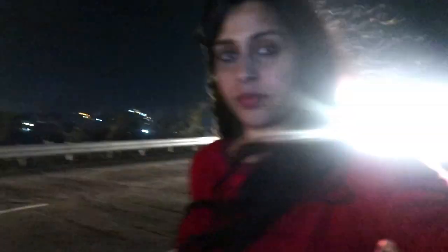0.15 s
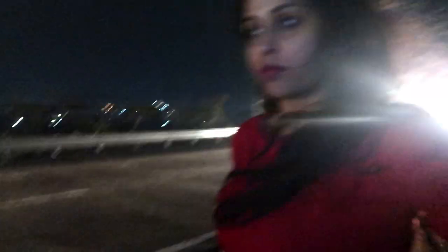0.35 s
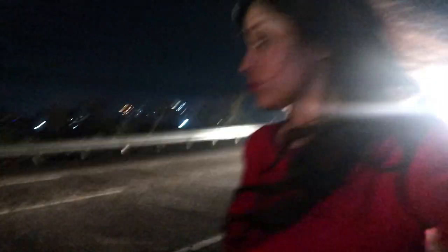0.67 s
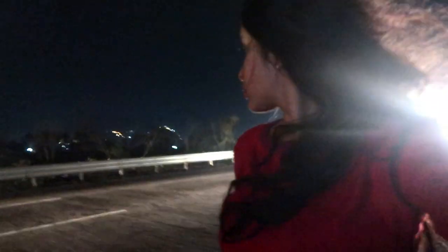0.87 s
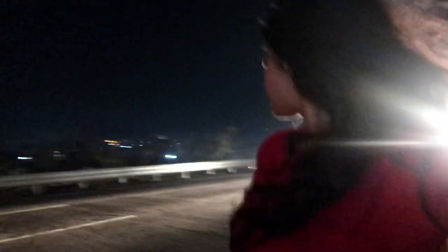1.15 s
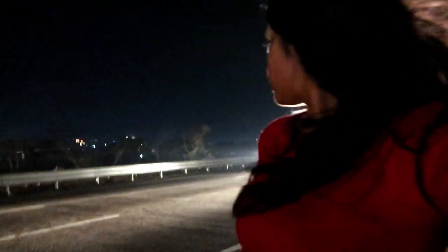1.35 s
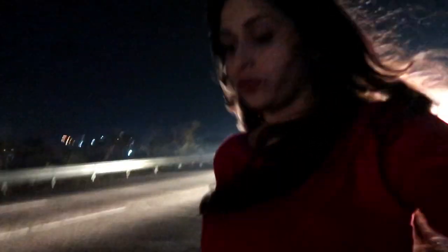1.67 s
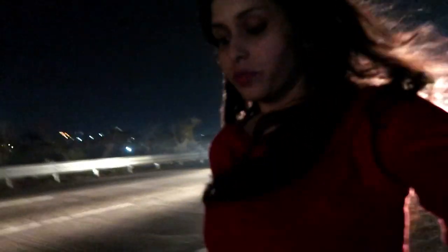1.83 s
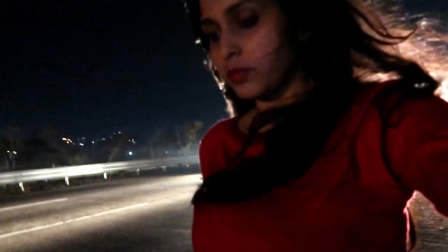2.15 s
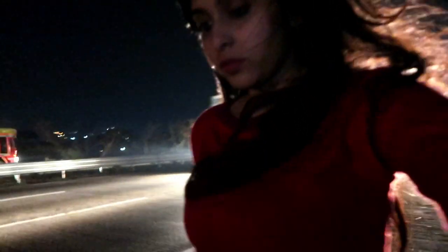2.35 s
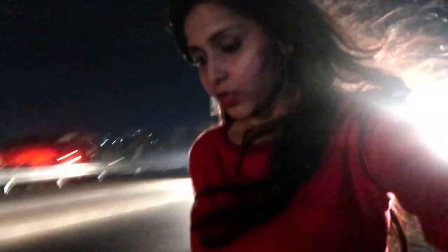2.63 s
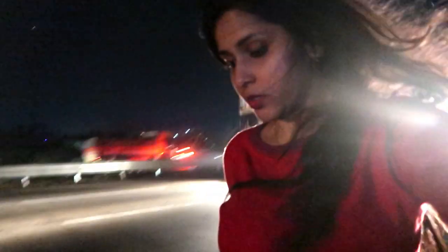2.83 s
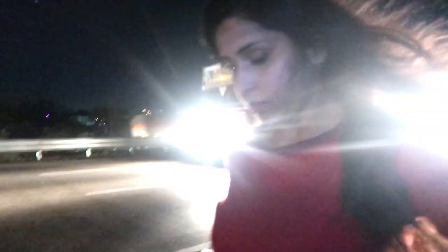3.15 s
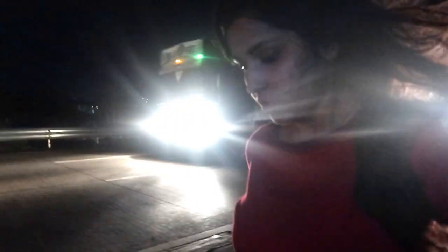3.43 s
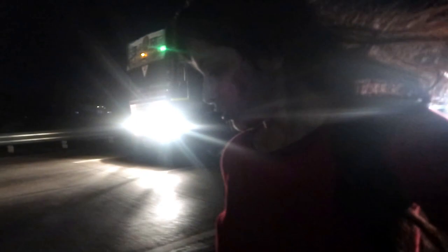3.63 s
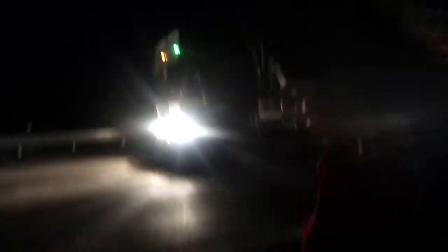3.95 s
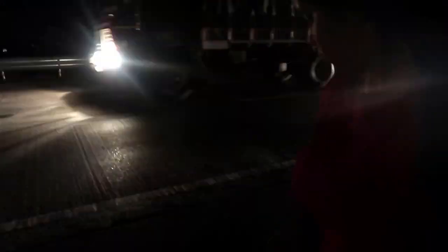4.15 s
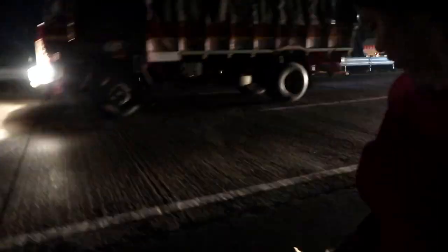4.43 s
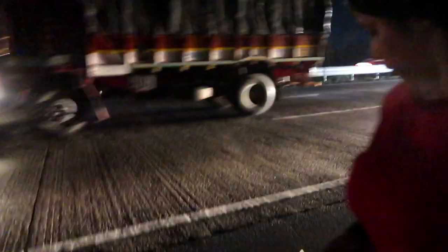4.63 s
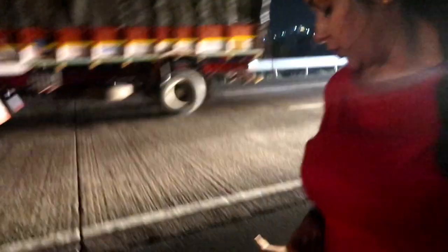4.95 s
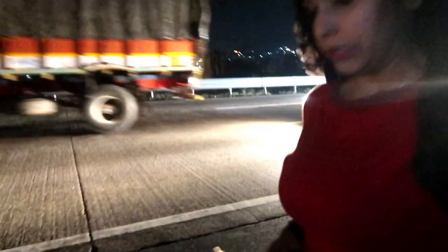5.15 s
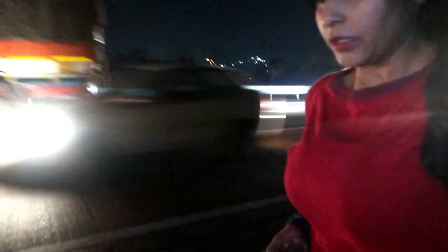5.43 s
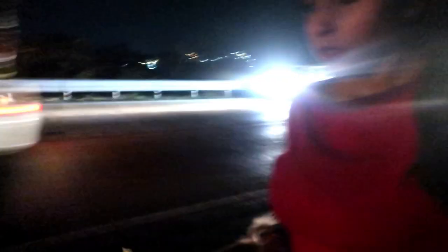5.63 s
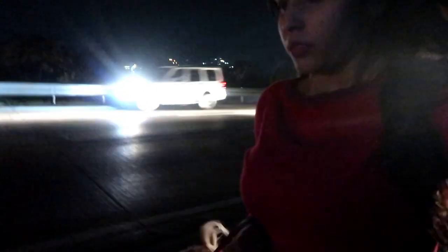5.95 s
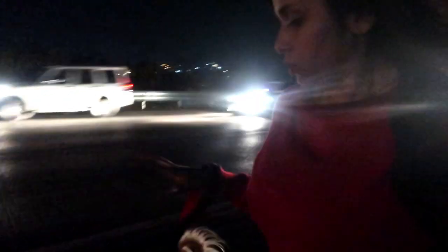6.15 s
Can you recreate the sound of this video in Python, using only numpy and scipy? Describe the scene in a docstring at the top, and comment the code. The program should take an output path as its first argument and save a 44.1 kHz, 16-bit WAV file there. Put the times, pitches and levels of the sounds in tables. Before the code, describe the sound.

Night highway heard from the shoulder: cars and a heavy truck rush past close by while gusts thump and buffet the microphone.

```python
"""A highway at night, heard from the shoulder: a far lorry drones, cars rush by, a heavy truck passes close.
Tyres are shaped noise that swells and fades with distance; drone, whine and chirps are fuzzy tones.
A tyre whine sinks at first, and a thin high chirping, like a bush cricket, comes from the verge.
Slipstream buffets the microphone in gusts of lumpy noise and in single thumps,
and the hardest make the gain control duck the traffic."""
import sys
import numpy as np
from scipy import signal
from scipy.fft import rfft, irfft, next_fast_len
from scipy.io import wavfile
from scipy.ndimage import uniform_filter1d, minimum_filter1d, map_coordinates

SR = 44100
rng = np.random.default_rng(int(sys.argv[2]) if len(sys.argv) > 2 else 0)


def wav_record(signal):
    """Record a signal, one row per channel, as 16-bit PCM in the file named by sys.argv[1]."""
    frames = np.transpose(np.atleast_2d(signal))
    bounded = np.clip(frames, -1, 1)
    # unit amplitude maps onto the largest positive 16-bit level
    quanta = np.round(bounded * 32767).astype(np.int16)
    wavfile.write(sys.argv[1], SR, quanta)


N = 277168  # length in samples


def amp(db):
    """Turn decibels into gain."""
    return 10 ** (np.asarray(db) / 20)


def unit(x):
    """Scale to an rms of 1."""
    return x / np.sqrt(np.mean(x ** 2) + 1e-20)


def seconds():
    """Time of every sample."""
    return np.arange(N) / SR


def noise():
    """Plain white noise."""
    return rng.standard_normal(N)


def bump(centre_s, spread_s):
    """A bell-shaped swell that peaks at 1."""
    return np.exp(-.5 * ((seconds() - centre_s) / spread_s) ** 2)


def curves(rows):
    """Join the rows with straight lines: one curve for each column after the time."""
    s, *columns = np.transpose(rows)
    return [np.interp(seconds(), s, column) for column in columns]


def wobble(rate):
    """A smooth random curve through `rate` random points a second."""
    return map_coordinates(rng.standard_normal(8192), [np.arange(N) * rate / SR], mode="wrap")


def filtered(x, response):
    """Multiply the spectrum of x by a gain that depends on frequency."""
    size = next_fast_len(N + 8192)
    spectrum = rfft(x, size) * response(np.fft.rfftfreq(size, 1 / SR))
    return irfft(spectrum, size)[..., :N]


def coloured(x, spectrum):
    """Shape x by points of Hz and relative dB on a log frequency axis, at an rms of 1."""
    points_hz, db = np.transpose(spectrum)
    return unit(filtered(x, lambda hz: amp(np.interp(np.log(hz + 1), np.log(points_hz), db))))


def rush(spectrum, patchy_db):
    """Noise at an rms of 1 whose gain drifts in patches of time and frequency."""
    cells = signal.stft(noise(), nperseg=1024)[2]
    across_pitch = uniform_filter1d(rng.standard_normal(cells.shape), size=5, axis=0)
    patches = unit(uniform_filter1d(across_pitch, size=10, axis=1))
    patchy = signal.istft(cells * amp(patchy_db * patches), nperseg=1024)[1][:N]
    return coloured(patchy, spectrum)


def narrow(pitch_hz, width_hz):
    """A fuzzy tone: slow random curves make a narrow band of noise that rides on a pitch curve."""
    phase = 2 * np.pi * np.cumsum(pitch_hz) / SR
    return unit(wobble(width_hz) * np.cos(phase) + wobble(width_hz) * np.sin(phase))


def stereo(mid, side):
    """Left and right from their common and opposite parts."""
    return np.array([mid + side, mid - side])


# What goes by. Each row: nearest moment in seconds, approach time in seconds, leaving time in seconds,
# tyre roar in dB, hiss in dB, wide hiss in dB.
PASSES = [(.42, 0.63, 0.33, -24, -34, -41.5), (2.86, 1, 0.29, -18.5, -27.5, -38),
          (4.22, 0.14, 0.067, -23, -20.5, -42), (4.56, 0.27, 0.31, -29, -23.5, -51),
          (5.1, 0.55, 0.16, -19, -19.5, -42.5), (5.52, 0.093, 0.14, -17.5, -21, -39.5),
          (5.79, 0.14, 0.48, -26.5, -46, -51), (6.19, 0.26, 0.3, -23, -23, -44)]
# Names for the rows, in order.
FIRST_CAR, FAR_LORRY, TRUCK_FRONT, TRUCK_BED, TRUCK_REAR, NEAR_CAR, FAR_CAR, LAST_CAR = range(len(PASSES))


def nearness(which, fall):
    """Gain of a vehicle on a straight lane: 1 at its nearest, falling as distance to the power `fall`."""
    nearest_s, approach_s, leaving_s = PASSES[which][:3]
    t = seconds() - nearest_s
    distance = np.hypot(1, t / np.where(t < 0, approach_s, leaving_s))
    return distance ** -fall


# Where the traffic lies, swinging from right to left. Each row: time in seconds,
# lead at the left port in microseconds, low treble of left over right in dB.
BEARING = [(0, -24, -0.5), (3.1, -7.5, 0.5), (4.2, -8, 1), (5.2, 3, -5.5), (6.2, 9, -5)]


def placed(x):
    """A road sound reaches one port slightly before the other; its slope times half the lead shifts it."""
    lead_us, _ = curves(BEARING)
    return stereo(x, np.gradient(x) * SR * lead_us / 1e6 / 2)


# Colour of the engine rumble. Each row: frequency in Hz, relative level in dB.
RUMBLE = [(20, -23.5), (45, -9.5), (75, 0.5), (120, 4), (190, 2), (300, -0.5), (600, -24), (1500, -90)]


def lorry(drone_hz=202, drone_db=-32.0, drone_fall=0.73, rumble_db=-26, rumble_fall=4.2,
          first_db=-29, first_fall=0.78, truck_db=-42):
    """A distant diesel: dark rumble under a fuzzy exhaust note. The first car and the truck rumble too."""
    engines = [(FAR_LORRY, rumble_db, rumble_fall), (FIRST_CAR, first_db, first_fall),
               (TRUCK_REAR, truck_db, rumble_fall)]
    power = sum((amp(db) * nearness(which, fall)) ** 2 for which, db, fall in engines)
    rumble = np.sqrt(power) * rush(RUMBLE, patchy_db=0.5)
    note = narrow(np.full(N, drone_hz), width_hz=22)
    drone = amp(drone_db) * nearness(FAR_LORRY, drone_fall) * note
    return stereo(rumble + drone, 0)


# Chirps from the verge. Each row: start in seconds, length in seconds, level in dB before the fade.
CHIRPS = [(.14, .07, -48), (.405, .1, -43.5), (.92, .09, -44.5), (1.17, .1, -41), (1.44, .11, -43),
          (1.69, .25, -39), (1.955, .19, -35), (2.21, .24, -37.5), (2.52, .2, -52), (2.765, .28, -45)]
CHIRP_HZ, CHIRP_SAG_HZ_PER_S = 11500, 320  # bottom of the dip at time 0; how fast later chirps lie lower


def cricket(dip_hz=550, dip_s=.045, fade_db=14, common_db=-36):
    """Each chirp dips in pitch as it swells, then climbs back and fades; the ports get nearly opposite phase."""
    t, level, pitch_hz = seconds(), np.zeros(N), np.full(N, float(CHIRP_HZ))
    for s, length, db in CHIRPS:
        age = np.maximum(t - s, 0)
        done = np.minimum(age / length, 1)  # how much of the chirp is over, 0 to 1
        level += amp(db - fade_db * done) * np.sqrt(np.abs(np.sin(np.pi * done)))
        dip = (age / dip_s) * np.exp(1 - age / dip_s)
        chirp_hz = CHIRP_HZ - CHIRP_SAG_HZ_PER_S * s + dip_hz * (1 - dip)
        pitch_hz = np.where(t >= s, chirp_hz, pitch_hz)
    chirping = level * narrow(pitch_hz, width_hz=360)
    return stereo(amp(common_db) * chirping, chirping)


# Colour of the very high hiss. Each row: frequency in Hz, relative level in dB.
LEAK = [(9000, -26), (11500, -14), (12700, 3), (14000, -4), (15200, -5.5)]


def leak(nearest_s=4.3, approach_s=.38, leaving_s=.25, level_db=-60):
    """A very high hiss, perhaps from the truck's air lines, swells as it nears and goes once it has passed."""
    spread_s = np.where(seconds() < nearest_s, approach_s, leaving_s)
    swell = bump(nearest_s, spread_s)
    return stereo(amp(level_db) * swell * coloured(noise(), LEAK), 0)


# Faint ticks. Each row: start in seconds, level in dB.
TICKS = [(6.014, -37.5), (6.158, -38.5)]
TICK_DECAY_S = 0.0088
# Colour of the ticks, and of the truck's spit of air. Each row: frequency in Hz, relative level in dB.
PUFF = [(2500, -2.5), (4500, 3), (7200, 3), (9000, -30), (14000, -33.5)]


def ticks():
    """Tiny bright ticks start at once and die away, just before the last car draws level."""
    t = seconds()
    level = sum(amp(db) * (t >= s) * np.exp(-np.abs(t - s) / TICK_DECAY_S) for s, db in TICKS)
    return stereo(level * coloured(noise(), PUFF), 0)


def whine(start_hz=2050, end_hz=1870, sink_s=.16, level_db=-29, wide_db=-37, fall=8.3):
    """A tread pattern sings hoarsely, sinking in pitch as its vehicle goes by."""
    pitch_hz = end_hz + (start_hz - end_hz) * np.exp(-seconds() / sink_s)
    song = narrow(pitch_hz, width_hz=200) + amp(0.5) * narrow(pitch_hz, width_hz=1600)
    wide = narrow(pitch_hz, width_hz=400) + narrow(pitch_hz, width_hz=1400)
    return nearness(FIRST_CAR, fall) * (placed(amp(level_db) * song) + stereo(0, amp(wide_db) * wide))


# Colours of the small tyres' roar, their sizzle and the highest fizz.
# Each row: frequency in Hz, relative level in dB.
TREAD = [(200, -29.5), (600, -8), (950, 0.5), (1350, 1), (1750, -5), (2400, -12.5), (5000, -78.5)]
SIZZLE = [(1500, -29), (3000, -0.5), (4300, 6), (6000, 4), (8200, -2.5), (10000, -5), (12000, -6.5),
          (13500, -15.5), (15000, -17)]
FIZZ = [(4000, -24.5), (6000, -9.5), (8000, -0.5), (10000, -4), (12000, -3.5), (14000, -14.5),
        (15000, -27.5)]


def cars(roar_db=-16, roar_fall=2.6, sizzle_db=-38, truck_sizzle_db=-38, sizzle_fall=1.1,
         fizz_db=-43, fizz_s=5.5, fizz_spread_s=.26):
    """Small fast tyres roar in a narrow band and sizzle, as do the truck's rear wheels; the nearest car fizzes."""
    roar = amp(roar_db) * nearness(FAR_CAR, roar_fall) * rush(TREAD, patchy_db=2.5)
    car_gain = amp(sizzle_db) * nearness(FAR_CAR, sizzle_fall)
    truck_gain = amp(truck_sizzle_db) * nearness(TRUCK_REAR, 2.8)
    sizzle = np.hypot(car_gain, truck_gain) * coloured(noise(), SIZZLE)
    fizz = amp(fizz_db) * bump(fizz_s, fizz_spread_s) * coloured(noise(), FIZZ)
    return placed(roar) + stereo(0, sizzle + fizz)


ROAR_FALL, HISS_FALL = 1.25, 1.36  # pressure falls as distance to these powers
DISTANT_ROAR_DB, DISTANT_HISS_DB, DISTANT_AIR_DB = -40.5, -53, -58  # the rest of the highway


def traffic():
    """Gains of roar, hiss and wide hiss: all passes add in power over the distant highway."""
    power = amp([[DISTANT_ROAR_DB], [DISTANT_HISS_DB], [DISTANT_AIR_DB]]) ** 2
    for which, (_, _, _, roar_db, hiss_db, air_db) in enumerate(PASSES):
        roar, hiss = nearness(which, ROAR_FALL), nearness(which, HISS_FALL)
        power = power + np.array([amp(roar_db) * roar, amp(hiss_db) * hiss, amp(air_db) * hiss]) ** 2
    return np.sqrt(power)


# Colours of the tread roar, the hiss, the wide hiss and the first car's coarse treads.
# Each row: frequency in Hz, relative level in dB.
ROAR = [(30, -42), (100, -22.5), (220, -2), (450, 2), (700, 0.5), (1000, 4.5), (1400, 4), (1900, 0),
        (2600, -6.5), (4000, -27), (7000, -86.5)]
HISS = [(300, -30), (1100, -14.5), (1900, 6), (2300, 1.5), (2900, 1), (3600, -5.5), (4500, -13),
        (5600, -21.5), (7200, -29), (8500, -55.5), (11000, -88.5)]
AIR = [(500, -36), (1200, -19.5), (2000, 8.5), (3000, 4), (4200, 3.5), (6000, -5.5), (8000, -8.5),
       (10000, -11), (12000, -16), (15000, -32.5)]
COARSE = [(600, -19.5), (1150, 4), (1400, 25), (2300, 5), (3100, 16.5), (3700, -21.5), (5000, -51)]


def tyres(uneven_db=.5, uneven_rate=13, coarse_db=-32, coarse_fall=1.3):
    """Treads roar on concrete near 1 kHz; air squeezed out of them hisses, heard only from close by."""
    roar_gain, hiss_gain, air_gain = traffic()
    roar = roar_gain * rush(ROAR, patchy_db=2.23)
    hiss = hiss_gain * rush(HISS, patchy_db=1.63)
    coarse = amp(coarse_db) * nearness(FIRST_CAR, coarse_fall) * rush(COARSE, patchy_db=10.0)
    wide_hiss = air_gain * rush(AIR, patchy_db=3)
    road = amp(uneven_db * wobble(uneven_rate))  # small random changes of level
    return road * (placed(roar + hiss + coarse) + stereo(0, wide_hiss))


# A short spit of air from the truck. Each row: middle in seconds, level in dB, spread in seconds.
SPIT = [(3.88, -43, .016)]
# Colour of the truck's spray. Each row: frequency in Hz, relative level in dB.
SPRAY = [(2000, -19), (3500, 1), (4500, 9), (6000, -24), (8000, -4), (10000, -24.5), (15000, -54.5)]


def truck(front_db=-39, bed_db=-41, fall=2.27, pan=.15):
    """The truck adds one long, fine, high spray as its cab and bed draw level, just after a spit of air."""
    front = amp(front_db) * nearness(TRUCK_FRONT, fall)
    bed = amp(bed_db) * nearness(TRUCK_BED, fall)
    spray = np.hypot(front, bed) * coloured(noise(), SPRAY)
    spit = sum(amp(db) * bump(s, spread) for s, db, spread in SPIT) * coloured(noise(), PUFF)
    return stereo(spray + spit, pan * spray)


# Gusts of slipstream. Each row: start in seconds, length in seconds, buffet level in dB.
GUSTS = [(0, 0.23, -22), (0.548, 0.48, -22.5), (0.764, 0.096, -18), (1.21, 0.037, -16), (1.323, 0.14, -23),
         (2.054, 0.21, -23), (2.42, 0.27, -17.5), (2.994, 0.313, -12), (3.313, 0.19, -12),
         (3.566, 0.037, -15), (3.74, 0.086, -19), (4.27, 0.434, -22.5), (4.794, 0.05, -21.5),
         (4.98, 0.026, -23), (5.156, 0.25, -18.5), (5.487, 0.24, -26.5), (6.147, 0.082, -19)]
GUST_ATTACK_S, GUST_RELEASE_S, BREEZE_DB = 0.072, 0.036, -28  # rise and decay; the air between gusts


def gusts():
    """Strength of the air in dB: each gust rises, holds and dies back into the breeze."""
    t, power = seconds(), amp(BREEZE_DB) ** 2
    for s, length, db in GUSTS:
        before, after = np.maximum(s - t, 0), np.maximum(t - s - length, 0)
        envelope = np.exp(-before / GUST_ATTACK_S - after / GUST_RELEASE_S)
        power = power + (amp(db) * envelope) ** 2
    return 10 * np.log10(power)


def eddies(spectrum, lumps_db):
    """Turbulence: pressure comes in lumps of a few milliseconds around a steady mean strength."""
    air = coloured(noise() * amp(lumps_db), spectrum)
    return air / np.sqrt(np.abs(uniform_filter1d(air ** 2, size=2600)) + 1e-6)


# Colours of the drumming and of the bright swirl. Each row: frequency in Hz, relative level in dB.
BUFFET = [(20, -49.5), (45, -38.5), (80, -18.5), (130, -8), (210, -1.5), (330, 0.5), (450, 1.5),
          (560, -5.5), (800, -7), (1300, -16.5), (2500, -34.5), (6000, -92)]
SWIRL = [(60, -45.5), (200, -26.5), (400, -1), (850, -1.5), (1500, -5), (2500, -14.5), (5000, -31.5),
         (10000, -81.5)]
# How unevenly the air meets the two ports. Each row: time in seconds, swirl in dB for a hard gust.
CROSSWIND = [(0, -29), (1.1, -27.5), (2.4, -34), (3.3, -32.5), (4.6, -36.5)]
HARD_GUST_DB, SWIRL_GROWTH = -16, 1.98  # buffet dB of a hard gust; dB of swirl per dB of buffet


def wind():
    """Slipstream drums on the microphone; in hard gusts its lumps swirl brightly, differently at each port."""
    buffet_db = gusts()
    cross_db, = curves(CROSSWIND)
    lumps = wobble(190)
    body = amp(buffet_db) * eddies(BUFFET, 2.1 * lumps)
    hard = amp(SWIRL_GROWTH * (buffet_db - HARD_GUST_DB))  # the swirl grows faster than the drumming
    bright = amp(-33.0) * hard * eddies(SWIRL, 6 * lumps)
    uneven = amp(cross_db) * hard * eddies(SWIRL, 2.5 * lumps)
    return stereo(body + bright, uneven)


# Single eddies striking the microphone. Each row: middle in seconds, peak of the swing in dB,
# pitch of the swing in Hz, spread of the flutter in seconds, bright rasp in dB.
THUMPS = [(.03, -9.5, 330, .003, -26), (.162, -9, 330, 0.01, -31), (.589, 1.5, 370, 0.0021, -19.5),
          (.674, -9, 330, 0.0021, -24), (.723, -3.5, 342, 0.0059, -25.5), (.739, -5, 280, 0.0049, -29),
          (.747, 3.5, 376, 0.0023, -11), (.803, 0, 357, 0.0084, -20), (.834, -1.5, 700, .0012, -13),
          (.841, 1.5, 277, 0.0011, -23), (.925, -7.5, 380, 0.0035, -33), (.981, -10, 400, 0.0036, -33),
          (1.043, -3.5, 308, .004, -31), (1.218, -6, 450, 0.0092, -21), (1.237, -4, 340, 0.011, -26),
          (1.259, -4, 302, 0.0082, -31), (1.272, -7, 300, 0.0025, -32), (1.351, -18, 125, 0.0054, -36),
          (1.403, -12.5, 380, .002, -29.5), (1.425, -17.5, 125, .005, -35), (1.452, -7.5, 390, .006, -24),
          (2.05, -9, 327, 0.0087, -31), (2.074, -4, 420, 0.0042, -28.5), (2.317, -9.5, 280, 0.016, -29),
          (2.712, -11.5, 129, 0.0069, -28), (2.81, -7.5, 288, 0.02, -31), (2.945, -14, 120, 0.0049, -29.5),
          (2.97, 4.5, 326, 0.002, -22), (3.0, -7, 320, .008, -26), (3.012, -3, 320, .008, -22),
          (3.028, -3, 340, .006, -25), (3.055, 0.5, 416, 0.0022, -12), (3.105, -2, 380, 0.0024, -20.5),
          (3.18, 2.5, 342, 0.0063, -19.5), (3.25, 0.5, 420, .017, -13), (3.272, 0.5, 400, .002, -12),
          (3.293, -15, 450, 0.0063, -14.5), (3.328, -6, 380, .008, -24), (3.415, -7, 700, .0015, -13.5),
          (3.477, -7, 380, 0.0093, -24), (3.5, -10, 380, .007, -22), (3.695, -11.5, 302, 0.0089, -21),
          (3.78, -16, 300.6, 0.0092, -21.5), (3.805, -7.5, 322, 0.0035, -27),
          (3.86, -13, 330, 0.0088, -36.5), (4.276, -4.5, 484, 0.0037, -22), (4.292, -7, 420, 0.0058, -17.5),
          (4.31, -13, 600, 0.0028, -14.5), (4.495, -9, 380, 0.014, -26), (4.823, -9, 330, 0.0044, -33),
          (5.156, -11, 320, 0.0043, -30.5), (5.245, -10, 297, 0.0049, -26.5),
          (5.272, -9.5, 420, 0.0049, -24.5), (5.33, -12, 333, 0.0031, -17.5),
          (5.39, -14, 330, 0.0061, -22.5), (6.199, -11, 300, 0.0059, -31.5)]
# Colours of the dull flutter and the bright rasp. Each row: frequency in Hz, relative level in dB.
FLUTTER = [(30, -49.5), (90, -10.5), (200, 6.5), (330, 2.5), (480, 3.5), (750, 2.5), (1200, -18.5),
           (2200, -28), (6000, -79)]
RASP = [(250, -26), (600, 6), (950, 7), (1500, -5), (2500, -18.5), (6000, -68.5)]


def thumps(flutter_db=-13, swing_cycles=0.4):
    """A large eddy hits as one round swing of pressure in a short dull flutter with some bright rasp."""
    t, out = seconds(), np.zeros(N)
    dull, bright = coloured(noise(), FLUTTER), coloured(noise(), RASP)
    signs = np.sign(rng.standard_normal(len(THUMPS)))  # push or pull at random
    for (s, db, swing_hz, length, rasp_db), sign in zip(THUMPS, signs):
        near = slice(*np.searchsorted(t, [s - .1, s + .1]))
        age = t[near] - s
        window = np.exp(-.5 * (age / length) ** 2)
        window_rms = np.sqrt(np.mean(window ** 2))
        flutter, rasp = (unit(air[near] * window) * window_rms for air in (dull, bright))
        cycles = swing_hz * age
        push = sign * np.cos(2 * np.pi * cycles) * np.exp(-.5 * (cycles / swing_cycles) ** 2)
        out[near] += amp(db) * (push + amp(flutter_db) * flutter) + amp(rasp_db) * rasp
    return stereo(out, 0)


def ports(x, centre_hz=4300, spread_hz=1100):
    """The low treble moves from the left port to the right as the truck goes by."""
    _, left_db = curves(BEARING)
    band = filtered(x, lambda hz: np.exp(-.5 * ((hz - centre_hz) / spread_hz) ** 2))
    return x + band * (amp(np.outer([.5, -.5], left_db)) - 1)


CEILING_DB, RECOVERY_DB_PER_S = -11.5, 11  # level above which the gain control cuts; how fast it lets go


def gain_control(x, attack_s=0.032):
    """A hard gust eases everything down within a few hundredths of a second; the traffic then creeps back up."""
    power = uniform_filter1d(np.mean(x ** 2, axis=0), size=480)
    level_db = 10 * np.log10(np.abs(power) + 1e-12)
    excess_db = np.maximum(level_db - CEILING_DB, 0)
    recovery = RECOVERY_DB_PER_S * seconds()
    cut_db = np.maximum.accumulate(excess_db + recovery) - recovery  # jumps up, slides down
    keep = np.exp(-1 / (attack_s * SR))
    return x * amp(-signal.lfilter([1 - keep], [1, -keep], cut_db))


def scene():
    """Road, wind and verge together."""
    background = lorry() + cricket() + leak() + ticks()
    road = whine() + cars() + tyres() + truck()
    return background + road + wind() + thumps()


TOP_HZ = 15200  # nothing is kept from here up


def record(dry):
    """Gain control, a limiter for the tallest peaks, and nothing above the band limit."""
    held = gain_control(ports(dry))
    needed = np.minimum(1, .82 / (np.abs(held).max(axis=0) + 1e-9))
    gain = uniform_filter1d(minimum_filter1d(needed, size=200), size=200)
    return filtered(held * gain, lambda hz: hz < TOP_HZ)


dry = scene()
out = record(dry)
wav_record(out)
```